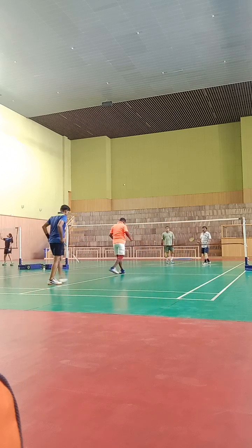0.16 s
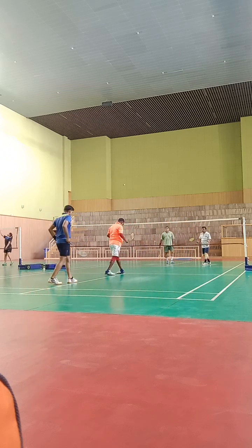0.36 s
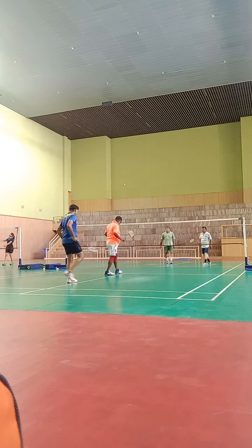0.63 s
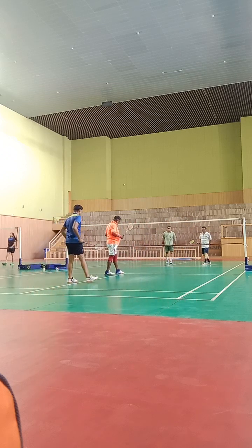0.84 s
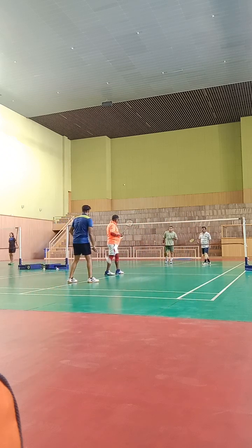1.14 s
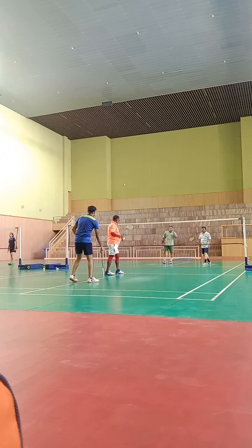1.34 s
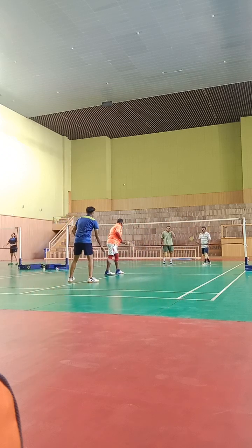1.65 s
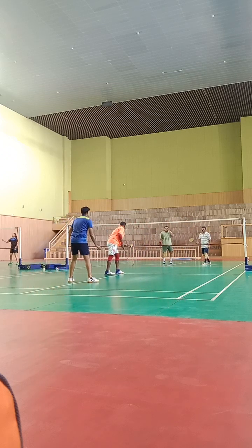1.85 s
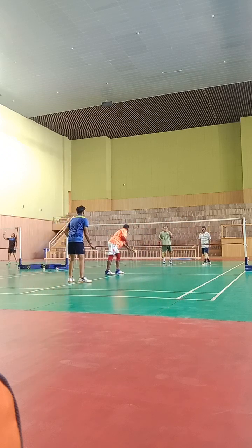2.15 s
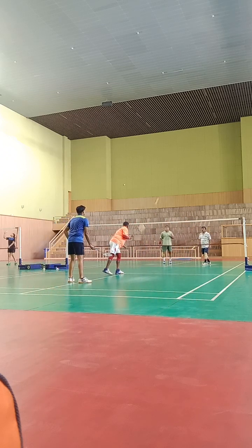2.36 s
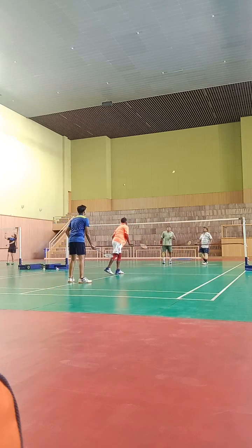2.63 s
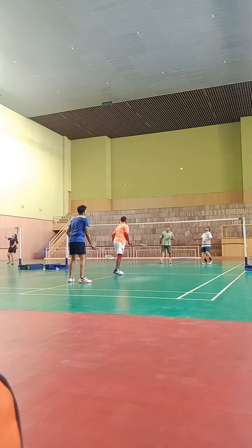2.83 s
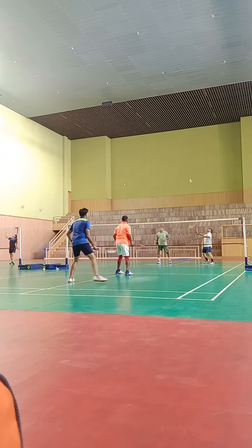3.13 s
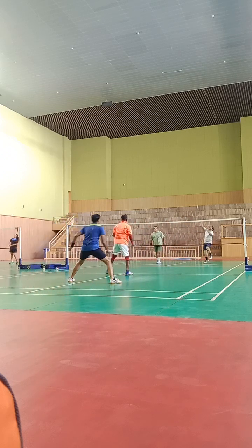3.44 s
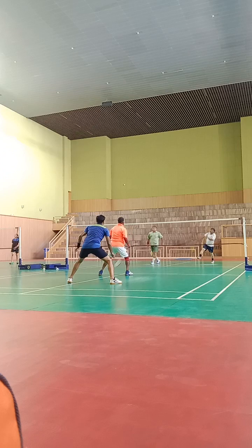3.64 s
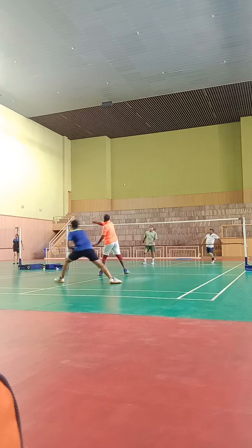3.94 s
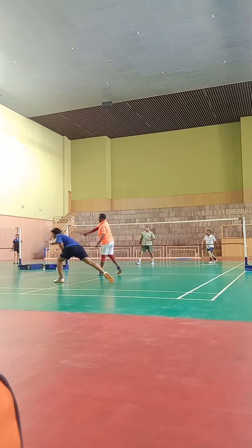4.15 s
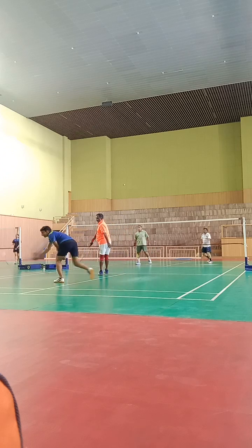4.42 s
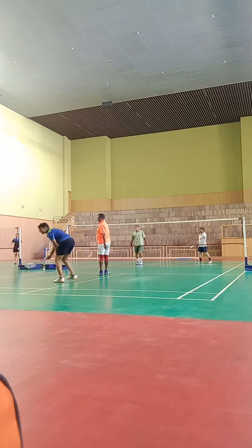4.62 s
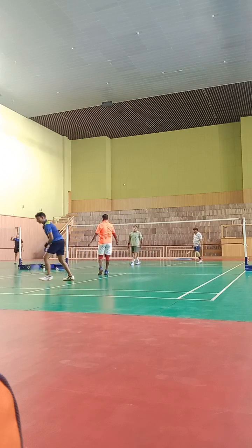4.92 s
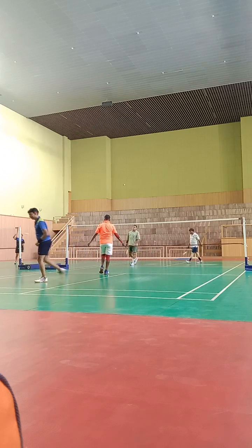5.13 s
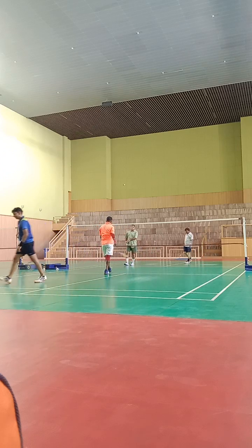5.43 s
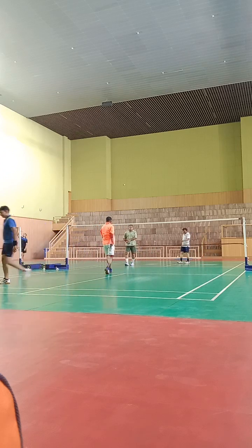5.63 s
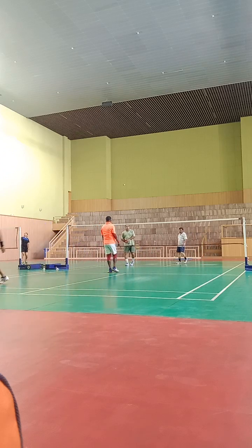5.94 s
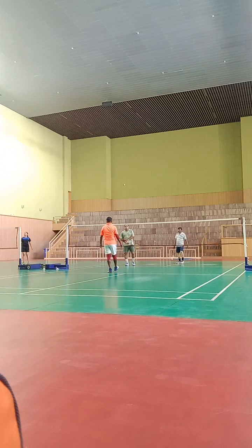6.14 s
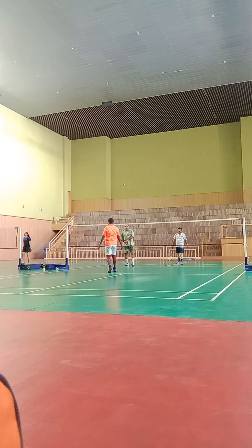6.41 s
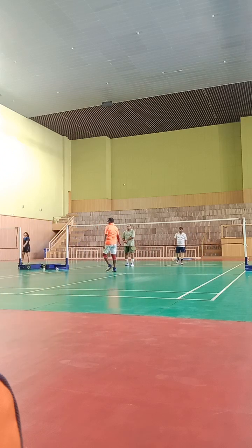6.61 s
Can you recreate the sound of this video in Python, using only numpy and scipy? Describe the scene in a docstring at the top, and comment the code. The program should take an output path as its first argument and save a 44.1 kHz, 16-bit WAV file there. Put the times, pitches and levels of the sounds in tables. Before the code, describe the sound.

A large reverberant sports hall: sharp, hollow badminton hits, strongest just after one second, near four and a half, and before six. Weaker hits fall between them, sometimes in close pairs. Footwork adds dry clicks, a dull floor boom and tiny sole squeaks toward the end. The microphone sits low behind the court, with faint unsteady ventilation hum underneath and slightly muffled background detail.

```python
"""A large sports hall with a badminton rally, heard from floor level behind the court.
Each stroke sums an air pulse, a knock, a frame ping, ringing strings and a crack of cork; ceiling and
walls throw back echoes, and a tail of sparse random reflections rings on. Shoes tap as clicks with one
resonance, squeak as wavering tones and once boom in the floor. Below lie a low, wavering harmonic hum
and shaped noise for the ventilation. Noise suppression turns the faintest sounds down furthest."""
import sys
import numpy as np
from scipy import signal
from scipy.fft import rfft, irfft, next_fast_len
from scipy.io import wavfile
from scipy.ndimage import uniform_filter1d

SR = 44100
rng = np.random.default_rng(int(sys.argv[2]) if len(sys.argv) > 2 else 0)


def store_pcm(level_fs):
    """Save levels as 16-bit WAV."""
    pcm = np.round(np.clip(level_fs, -1, 1) * 32767).astype(np.int16)
    wavfile.write(sys.argv[1], SR, np.atleast_2d(pcm).T)


N = 298557

# Click spectrum of shoes on the court, tilted brighter for cork on strings:
# (frequency [Hz], relative level [dB])
CLICK_SPECTRUM = [(500, -5), (1500, 17.5), (2000, 0.5), (2800, 8), (3600, 2), (4200, -9.5), (5400, 3.5),
                  (7000, -4.5), (8500, -15.5), (9800, -22), (13000, -17.5), (16000, -19)]


def gain_of(db):
    """Turns decibels into an amplitude factor."""
    return 10 ** (np.asarray(db) / 20)


def evened(x):
    """Scales to rms 1."""
    return x / np.sqrt(np.mean(x ** 2) + 1e-20)


def sized(x, db):
    """Gives a short sound the energy of a hundredth of a second at this level."""
    return gain_of(db) * x * np.sqrt(SR / 10 ** 2 / np.sum(x ** 2))


def read(points, hz):
    """Reads a table on a log-frequency axis."""
    f, value = np.transpose(points)
    return np.interp(np.log(hz + 1), np.log(f + 1), value)


def add(mix, s, sound):
    """Mixes a sound in at time s, in seconds."""
    part = mix[max(round(s * SR), 0):][:len(sound)]
    part += sound[:len(part)]


def noise(shape):
    """Noise of rms 1 whose amplitude spectrum follows shape(Hz)."""
    size = next_fast_len(N)
    spectrum = rfft(rng.standard_normal(size)) * shape(np.fft.rfftfreq(size, 1 / SR))
    return evened(irfft(spectrum, size)[:N])


def slow(rate_hz):
    """A random wander of rms 1, no faster than this rate."""
    return noise(lambda hz: hz < rate_hz)


def duller(x, hz):
    """Rolls the treble off gently, at 6 dB per octave."""
    return signal.lfilter(*signal.butter(1, min(hz, SR / 3), fs=SR), x)


def click(spectrum, size=4096):
    """The shortest causal (minimum-phase) pulse with this spectrum."""
    log_gain = np.log(gain_of(read(spectrum, abs(np.fft.fftfreq(size, 1 / SR)))))
    return np.fft.ifft(np.exp(np.conj(signal.hilbert(log_gain)))).real


def mode(hz, t60, rise=0.00039, size=4096):
    """One dying vibration, set going over the time of contact; t60 and rise in seconds."""
    t = np.arange(size) / SR
    decay = np.exp(-np.log(1000) * t / t60)
    return np.sin(2 * np.pi * hz * t) * decay * (1 - np.exp(-t / rise))


def scatter(x, spread, share, rise=0.003):
    """Follows a sound with a spray of small copies that swells and quickly dies, energy unchanged."""
    t = np.arange(len(x)) / SR
    spray = rng.standard_normal(len(x)) * np.exp(-t / spread) * (1 - np.exp(-t / rise))
    spray *= share / np.linalg.norm(spray)
    spray[0] += 1  # the sound itself
    fade = np.minimum(10 * (1 - t / t[-1]), 1)  # over the last tenth
    out = signal.fftconvolve(x, spray)[:len(x)] * fade
    return out * np.linalg.norm(x) / np.linalg.norm(out)


def ventilation(hum_hz=90.7, waver=0.03886, throb=0.33, throb_hz=9, rumble_db=-11):
    """A harmonic hum, unsteady in pitch and level, over duct rumble and a soft wash of air."""
    # harmonics of the hum: (multiple, relative level [dB])
    hum_orders = [(1, -8.5), (2, -26), (3, -26.5)]
    # duct noise around the hum: (frequency [Hz], relative density [dB per Hz])
    rumble_spectrum = [(20, -14), (45, -6.5), (75, -4), (90, 0), (115, -2.5), (160, -22.5), (400, -73)]
    # wash of air: (frequency [Hz], relative density [dB per Hz])
    air_spectrum = [(20, -2), (45, -20), (90, -4.5), (160, -11), (300, -5), (800, -5), (1200, -15),
                    (1620, -16.5), (1950, -28), (3300, -25.5), (4200, -39), (5400, -27), (7000, -36.5),
                    (9300, -50)]
    # hum and its rumble over time: (time [s], level [dB])
    drone_level = [(0.0, -45), (0.07, -78), (0.22, -49.5), (0.71, -44.5), (0.77, -58), (0.81, -45.5),
                   (1.11, -42), (1.22, -50.5), (1.28, -38), (1.7, -41.5), (1.75, -46), (2.98, -41.5),
                   (3.13, -59), (4.26, -61.5), (4.86, -45), (4.92, -52), (5.02, -43.5), (5.07, -74),
                   (5.26, -36.5), (5.33, -53.5), (5.58, -49.5), (5.62, -52), (5.77, -41), (5.96, -42.5),
                   (6.69, -41.5), (6.77, -56)]
    # wash of air over time: (time [s], level [dB])
    air_level = [(0, -57), (.6, -51), (2.0, -50), (2.9, -49.5), (3.2, -54), (4.1, -54.5), (4.8, -46),
                 (5.6, -54), (6.1, -47.5), (6.77, -50)]

    t = np.arange(N) / SR
    turns = np.cumsum(hum_hz * (1 + waver * slow(14))) / SR
    harmonics = sum(gain_of(db) * np.sin(2 * np.pi * k * turns) for k, db in hum_orders)
    hum = evened(harmonics * (1 + throb * slow(throb_hz)))
    rumble = noise(lambda hz: gain_of(read(rumble_spectrum, hz)))
    drone = hum + gain_of(rumble_db) * rumble
    air = noise(lambda hz: gain_of(read(air_spectrum, hz)))
    drone_gain = gain_of(np.interp(t, *np.transpose(drone_level)))
    air_gain = gain_of(np.interp(t, *np.transpose(air_level)))
    return drone * drone_gain + air * air_gain


def hall(x, early_db=-6, lumpy_db=1.0, grain_db=0.5, patchy_db=3.5):
    """Uneven sparse reflections, weaker until the far walls answer, each band dying at its own rate."""
    # reverberation: (frequency [Hz], time to fall 60 dB [s])
    decay_times = [(100, 0.24), (300, 0.85), (600, 0.65), (1000, 1.11), (1600, 1.09), (3200, 0.75),
                   (5500, 0.63), (7500, 0.49), (10000, 0.34), (16000, 0.32)]
    # colour of the reflections: (frequency [Hz], relative level [dB])
    colour = [(100, -16.5), (350, -5.5), (700, -2), (1100, -3.5), (2000, -4.5), (3200, 5), (5500, 2.5),
              (12000, -5)]

    count = 3 * SR // 2
    t = np.arange(count) / SR
    before_walls = t < .023
    reflections = rng.standard_normal(count) * (rng.random(count) < .15)
    lumps = evened(uniform_filter1d(rng.standard_normal(count), size=400))
    grain = rng.standard_normal(count)
    reflections *= gain_of(lumpy_db * lumps + grain_db * grain + early_db * before_walls)
    hz, when, z = signal.stft(reflections, SR, nperseg=512)
    # interfering paths favour some narrow bands for a moment, then others
    patches = uniform_filter1d(rng.standard_normal(z.shape), size=3, axis=0)
    patches = evened(uniform_filter1d(patches, size=16, axis=1))
    colour_db = read(colour, hz)[:, None] + patchy_db * patches
    decay = np.exp(-np.log(1000) * when / read(decay_times, hz)[:, None])
    z = z * decay * gain_of(colour_db)
    tail = signal.istft(z, SR, nperseg=512)[1] / np.linalg.norm(reflections) * 4.99
    return signal.fftconvolve(x, tail)


def lunge(s=4.82, hz=100, db=-30.5):
    """The sprung floor gives under a heavy step and booms for a few cycles."""
    out = np.zeros(N)
    add(out, s, sized(mode(hz, t60=0.06, rise=0.037, size=16384), db))
    return out


def court(squeak_hall_db=-10):
    """Taps as a click with one short resonance, and brief stick-slip squeaks of rubber."""
    # taps and thuds of shoes and shuttle: (time [s], click level [dB], resonance [Hz],
    # resonance level [dB], hall send [dB])
    tap_events = [(1.679, -42, 3050, -54.5, -1), (4.686, -37.5, 1454, -39, -1), (4.816, -64, 1460, -38, -7),
                  (4.847, -69.5, 755, -31.5, -30), (4.856, -56.5, 1560, -38, -10),
                  (4.939, -61, 2670, -42.5, -14.5), (4.939, -64, 4930, -47, -19),
                  (5.125, -52, 550, -30.5, 2), (5.163, -69.5, 420, -29.5, -5.5),
                  (6.175, -48.5, 2110, -53.5, 9.5), (6.2, -32.5, 3400, -40.5, -7.5),
                  (6.232, -34, 5250, -39.5, -10)]
    # rubber soles: (time [s], length [s], pitch [Hz], level [dB])
    squeak_events = [(5.549, 0.022, 3500, -46), (5.698, 0.053, 3530, -58)]

    out, to_hall = np.zeros(N), np.zeros(N)
    for s, db, hz, mode_db, hall_db in tap_events:
        tap = sized(click(CLICK_SPECTRUM), db) + sized(mode(hz, t60=15 / hz), mode_db)
        add(out, s, scatter(tap, spread=0.017, share=1.55))
        add(to_hall, s, gain_of(hall_db) * tap)
    for s, length, hz, db in squeak_events:
        count = int(length * SR)
        # the pitch wavers as the sole sticks and slips
        slip = .022 * evened(uniform_filter1d(rng.standard_normal(SR), size=80))[:count]
        pressure = signal.windows.tukey(count) * np.linspace(1, 0, count)
        tone = np.sin(2 * np.pi * np.cumsum(hz * (1 + slip)) / SR)
        squeak = gain_of(db) * evened(tone * pressure)
        add(out, s, squeak)
        add(to_hall, s, gain_of(squeak_hall_db) * squeak)
    return out + hall(to_hall)[:N]


def nearby(x, bounce_db=-5.5, spray_share=0.68):
    """The straight path, one bounce off a surface close to the microphone, and a spray from things around."""
    out = x.copy()
    add(out, .0025, gain_of(bounce_db) * x)
    return scatter(out, spread=0.0068, share=spray_share, rise=0.0029)


def echo(push, knock, ring, crack, lag, surface, edge_at_1s_hz=2500, dull_hz=1600, compact_share=1.0):
    """One return: a compact dull thud, ring and crack spread by the seating, air dulling longer paths."""
    push_db, knock_db, ring_db, crack_db = surface
    low_pass = signal.butter(4, dull_hz, fs=SR, output="sos")
    thud = signal.sosfilt(low_pass, gain_of(push_db) * push + gain_of(knock_db) * knock)
    edge_hz = edge_at_1s_hz / np.sqrt(lag)
    faded = duller(duller(crack, edge_hz), edge_hz)
    return (scatter(thud, spread=0.0064, share=compact_share)
            + gain_of(ring_db) * scatter(ring, spread=0.028, share=1.23)
            + gain_of(crack_db) * scatter(faded, spread=0.012, share=5.4))


def rackets(straight_ring_db=-11, hall_ring_db=-1.5, ring_lag=0.025, straight_hz=8000, second_mode_db=-3):
    """Strings radiate along the court, so their ring arrives mostly by way of the walls."""
    # racket strokes: (time [s], push [Hz], push level [dB], knock [Hz], knock level [dB],
    # main string mode [Hz], second string mode [Hz], ring level [dB], crack level [dB], hall send [dB],
    # ceiling lag [s], side wall lag [s], far wall lag [s], echo send [dB])
    strokes = [(0.002, 543, -35, 1020, -41.5, 1040, 989, -41, -46.5, 2.5, 0.037, 0.094, 0.057, -5.5),
               (0.839, 539, -30, 970, -37, 1145, 1184, -27.5, -38, 5, 0.027, 0.035, 0.099, 4),
               (1.272, 404, -23, 967, -16, 1046, 925, -13, -24.5, 2, 0.021, 0.076, 0.12, -7),
               (2.176, 525, -43, 1230, -40, 738, 1176, -33, -33.5, 1, 0.021, 0.1, 0.16, -0.5),
               (2.712, 550, -38.5, 924, -29, 974, 978, -37, -43, -0.5, .034, 0.044, 0.07, -1.5),
               (3.3818, 584, -26, 1025, -36, 1147, 1143, -28.5, -36.5, 3, 0.019, 0.044, 0.15, 1.5),
               (3.636, 476, -21, 1032, -23.5, 1094, 947, -28, -29, -1, 0.025, .0555, .1415, 0.5),
               (4.216, 478, -51.5, 720, -79, 761, 725, -39, -43.5, 10.5, 0.038, 0.058, 0.17, -0.5),
               (4.4446, 331, -28.5, 1027, -14, 1074, 760, -21, -26, 2, 0.031, 0.098, 0.16, -2.5),
               (5.107, 404, -37.5, 650, -37.5, 1187, 1015, -34, -38, 5, .024, 0.045, 0.13, 6.5),
               (5.735, 389, -21, 799, -15.5, 1079, 846, -19, -26, 4, 0.022, 0.063, 0.14, -1.5),
               (6.2, 513, -56.5, 1113, -41, 747, 810, -29.5, -40.5, 6, .032, 0.12, 0.16, -3)]
    # push of air from the racket face: (multiple of the push frequency, relative level [dB])
    push_spectrum = [(.1, -51.5), (.45, -14.5), (.75, -1), (1.05, -1), (1.5, 5), (2.5, -16.5), (4, -47.5),
                     (6, -35), (12, -56)]
    # ping of the frame: (frequency [Hz], level over the mean of push and knock [dB])
    frame_modes = [(1400, -7.5), (1680, -7), (2200, -14.5)]
    # what each surface gives back: (push [dB], knock [dB], ring [dB], crack [dB])
    ceiling = (-3.5, -9.5, -12, -2)
    side_wall = (-8.5, 0, 0, -13)
    far_wall = (-38, -4, -2, -14.5)
    back_wall = (-36.5, -15, -8, -17.5)
    # the wall behind the microphone answers equally late wherever the player stands
    back_lag = .179

    out, rings = np.zeros(N), np.zeros(N)
    for (s, push_hz, push_db, knock_hz, knock_db, main_hz, second_hz, ring_db, crack_db, hall_db,
         ceiling_lag, side_lag, far_lag, echo_db) in strokes:
        push = sized(click([(k * push_hz, db) for k, db in push_spectrum]), push_db)
        knock = sized(mode(knock_hz, t60=0.0099, rise=0.00086), knock_db)
        body_db = (push_db + knock_db) / 2
        frame = sum(sized(mode(hz, t60=0.015, rise=0.002), body_db + db) for hz, db in frame_modes)
        ring = sized(mode(main_hz, t60=.07, rise=.006), ring_db)
        ring = ring + sized(mode(second_hz, t60=.05, rise=.005), ring_db + second_mode_db)

        # dB per octave; a nearer player has a later ceiling echo and a brighter crack
        tilt_db = 4.5 + 234 * (ceiling_lag - .03)
        crack_spectrum = [(hz, db + tilt_db * np.log2(hz)) for hz, db in CLICK_SPECTRUM]
        crack = sized(click(crack_spectrum), crack_db)
        # the cork rattles over several strings
        rattle = duller(scatter(crack, spread=.0016, share=2.2, rise=.002), straight_hz)

        add(out, s, nearby(push + knock + frame + rattle + gain_of(straight_ring_db) * ring))
        add(out, s, gain_of(hall_db) * hall(push + knock + frame + crack))
        add(rings, s + ring_lag, gain_of(hall_db + hall_ring_db) * ring)
        returns = [(ceiling_lag, ceiling), (side_lag, side_wall), (far_lag, far_wall), (back_lag, back_wall)]
        for lag, surface in returns:
            add(out, s + lag, gain_of(echo_db) * echo(push, knock, ring, crack, lag, surface))
    return out + hall(rings, lumpy_db=2.25, patchy_db=2.5)[:N]


def scene():
    """Ventilation, footwork and rackets in one hall."""
    return (rackets() + court() + lunge() + ventilation())[None]


def suppress(x, depth_db=5, over_db=13, knee_db=3):
    """Noise suppression: each band loses 0.75 x depth_db where it stands clear of its background, and up to
    1.75 x depth_db where it barely tops it."""
    z = signal.stft(x, SR, nperseg=1024, noverlap=768)[2]
    power = uniform_filter1d(abs(z) ** 2, size=3, axis=-1)
    power = uniform_filter1d(power, size=3, axis=-2)
    level = 10 * np.log10(power.clip(1e-20))
    # the background is the lower quartile of the band's levels
    clear = level - np.percentile(level, 25, axis=-1, keepdims=True)
    # from 0.75 of the depth for clear sounds to 1.75 of it for the faintest
    z = z * gain_of(-abs(depth_db) * (2.5 - np.tanh((clear - over_db) / knee_db)) / 2)
    return signal.istft(z, SR, nperseg=1024, noverlap=768)[1][..., :N]


def record(dry, low_hz=55, edge_hz=15900):
    """The microphone's low cut, noise suppression above the bass, and the upper band limit."""
    x = signal.sosfilt(signal.butter(2, low_hz, "high", fs=SR, output="sos"), dry)
    bass = signal.sosfiltfilt(signal.butter(4, 170, fs=SR, output="sos"), x)
    x = bass + suppress(x - bass)
    band_limit = signal.firwin(511, edge_hz, window=("kaiser", 9), fs=SR)
    return signal.oaconvolve(x, band_limit[None], "same")


dry = scene()
out = record(dry)
store_pcm(out)
```